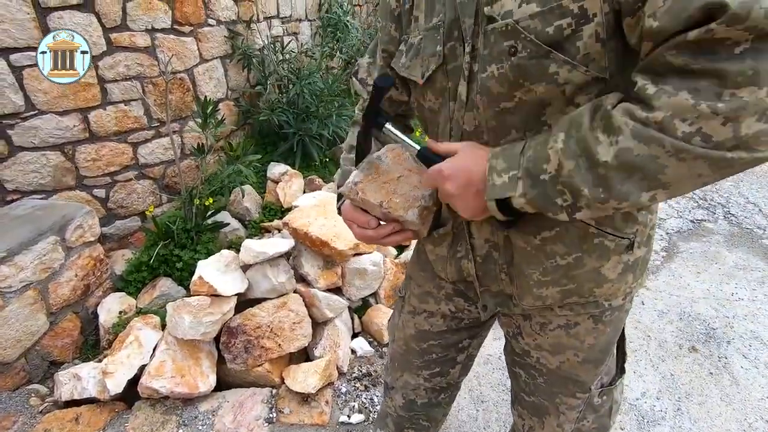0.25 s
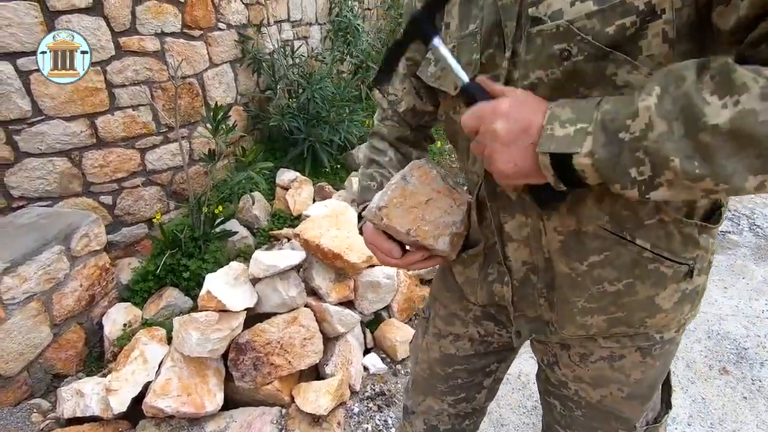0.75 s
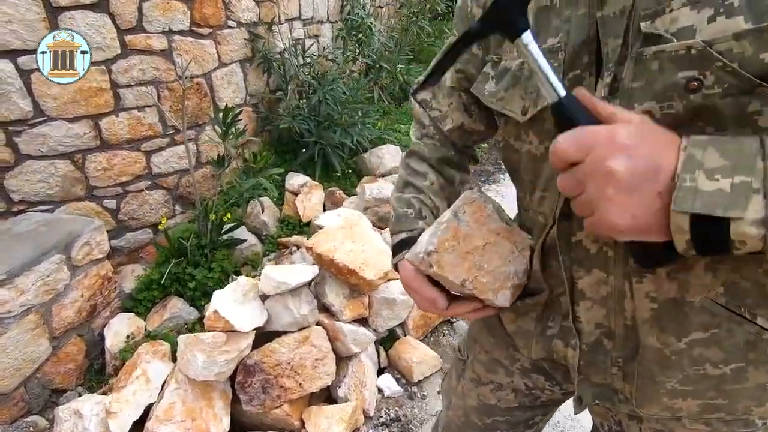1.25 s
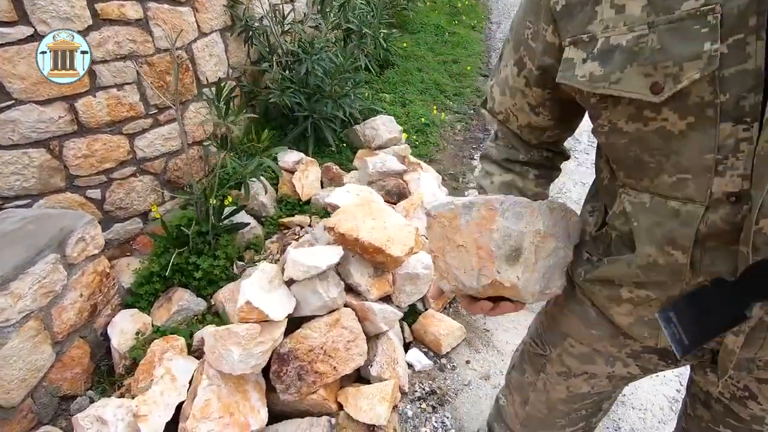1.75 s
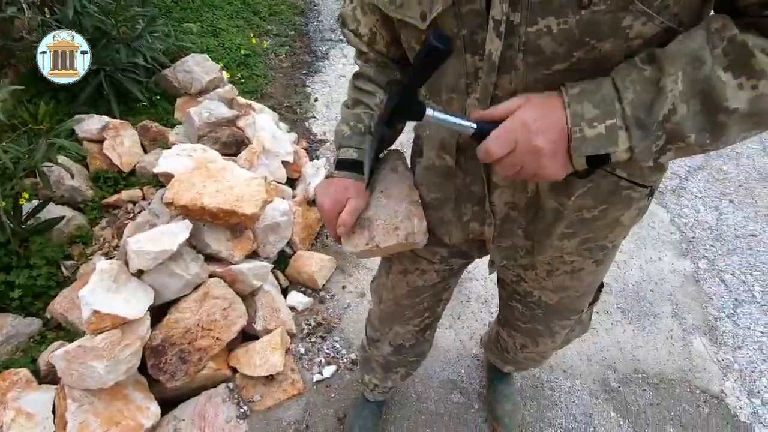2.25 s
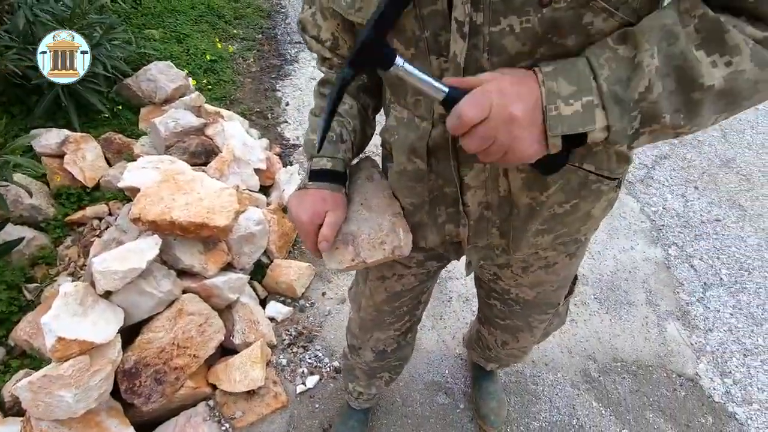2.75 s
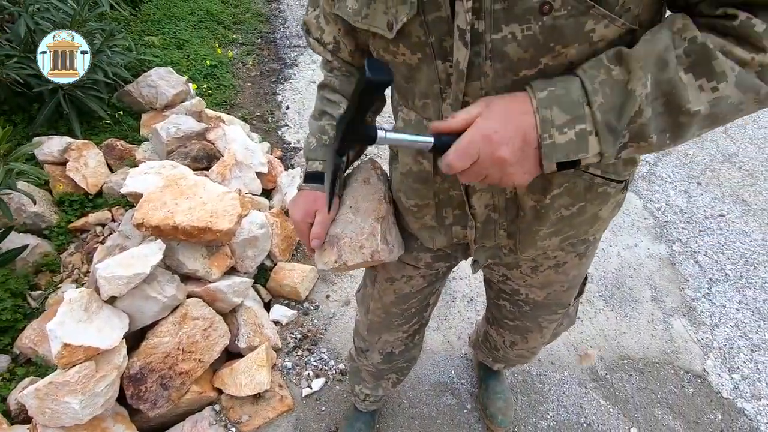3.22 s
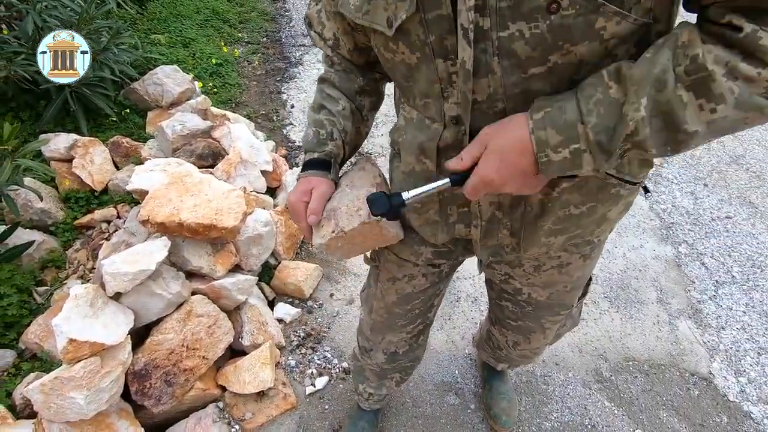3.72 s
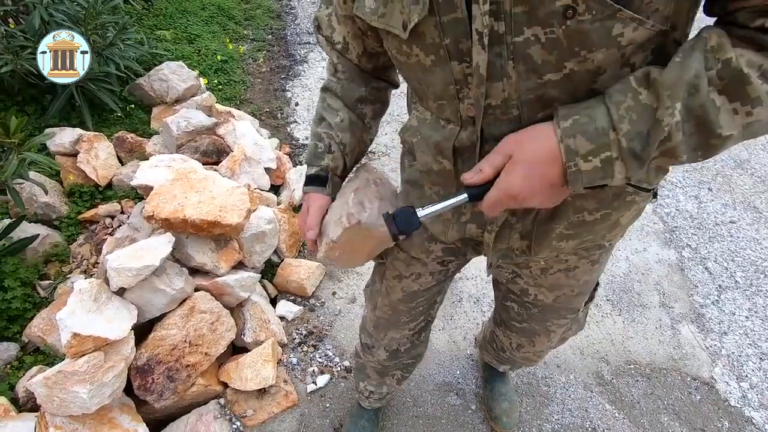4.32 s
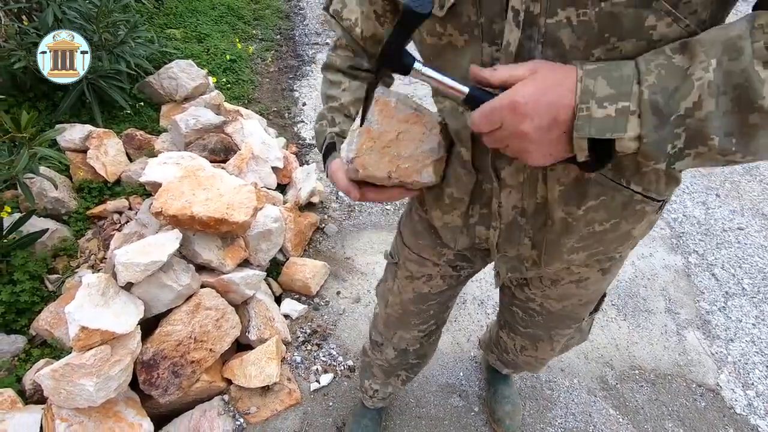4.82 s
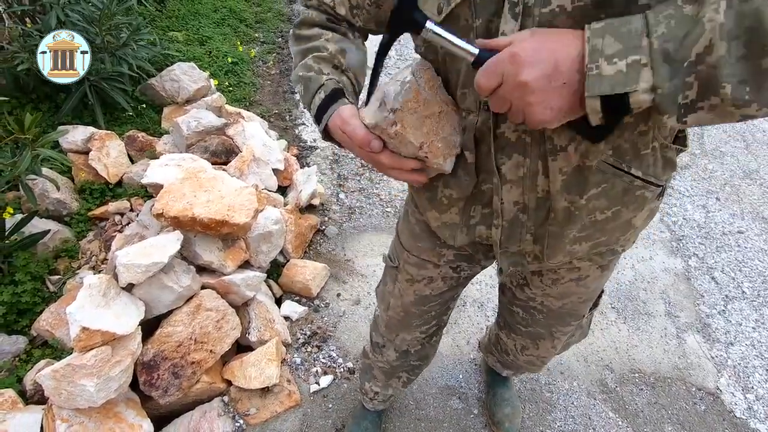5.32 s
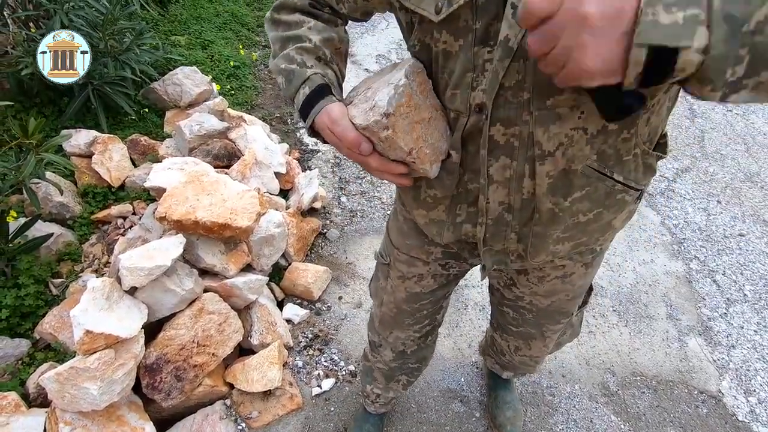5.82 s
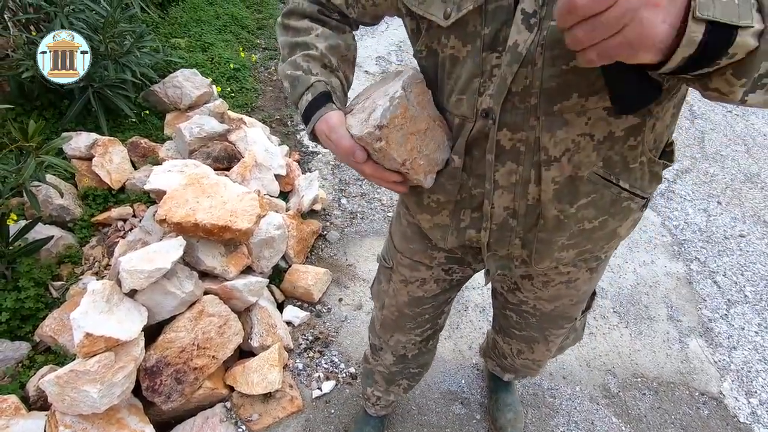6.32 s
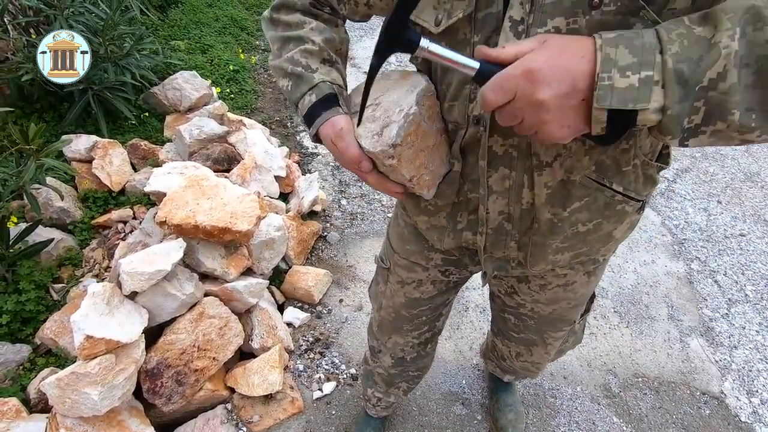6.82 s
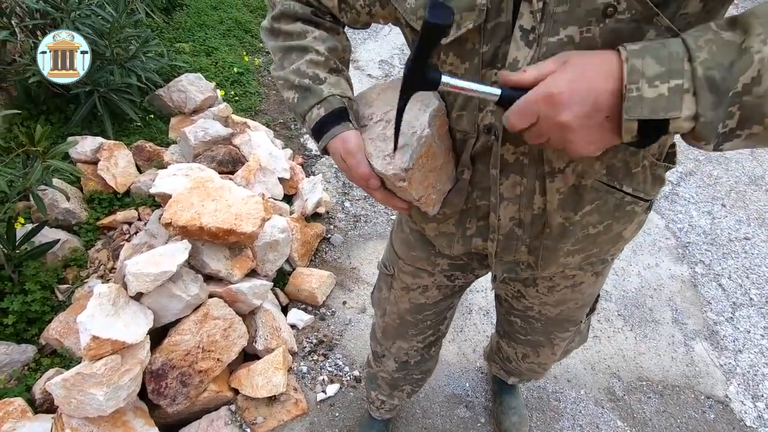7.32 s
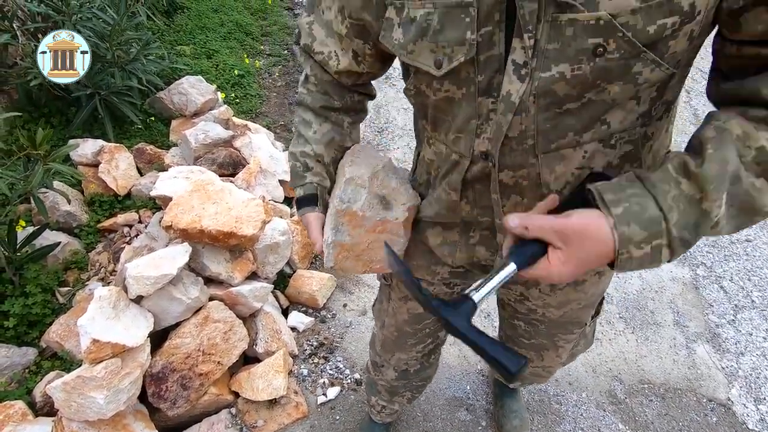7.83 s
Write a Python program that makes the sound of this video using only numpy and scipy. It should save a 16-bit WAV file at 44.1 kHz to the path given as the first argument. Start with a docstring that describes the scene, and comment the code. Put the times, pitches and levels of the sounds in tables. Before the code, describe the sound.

Sharp, short knocks of steel on rough stone, uneven in pitch and force, run steadily with two brief breaks. In the breaks the stone is turned, rubbing the palm and scraping while coarse sleeves rustle. Tiny chips tick and grit patters after blows. The work is close and central, almost dry, with only a faint wall reflection, light wind rumble and a far low drone.

```python
"""Sharp knocks come in runs at about four a second: a mason dresses a hand-held stone with a steel hammer outdoors.
Soft noise swells up to each knock; stone modes clack, with copies a few ms before and after, mostly weaker.
The hand thuds, steel and handle ring faintly; bursts of grains make the grit after every blow, chips and scrapes.
Banded noise makes the sleeves rustle, flicking after each blow, and the palm rub as the stone is turned.
Shaped noise makes the gusts that buffet the microphone, the open air and a low far drone; a wall adds a faint tail."""
import sys
import numpy as np
from scipy import signal
from scipy.fft import rfft, irfft, next_fast_len
from scipy.io import wavfile
from scipy.ndimage import uniform_filter1d

SR = 44100
rng = np.random.default_rng(int(sys.argv[2]) if len(sys.argv) > 2 else 0)


def waveform_to_disk(signal):
    """Save audio, clipped to [-1, 1], as 16-bit WAV at the path in sys.argv[1]."""
    frames = np.transpose(np.atleast_2d(signal))
    scaled = np.clip(frames, -1, 1) * 32767
    samples = np.round(scaled).astype(np.int16)
    wavfile.write(sys.argv[1], SR, samples)


N = 355798
TIME = np.arange(N) / SR
AGE = np.arange(SR // 2) / SR  # time since a contact, s
SHORT = AGE[:SR // 10]
GRIT_FILTER = signal.butter(6, 9300, fs=SR, output="sos")  # low-pass


def undb(db):
    """Decibels to gain."""
    return 10 ** (np.asarray(db) / 20)


def unit(x):
    """Scale to rms 1."""
    return x / np.sqrt(np.mean(x ** 2))


def hit_level(x, db):
    """Scale a short sound so that its energy, spread over 10 ms, has this rms level."""
    return x * undb(db) / np.sqrt(np.sum(x ** 2) / (SR / 100))


def add(track, s, x):
    """Mix x into the track at time s."""
    i = int(s * SR)
    track[i:i + len(x)] += x[:len(track) - i]


def band(x, lo_hz, hi_hz):
    """Causal band-pass."""
    sos = signal.butter(2, [lo_hz, min(hi_hz, SR / 2 - 10)], "band", fs=SR, output="sos")
    return signal.sosfilt(sos, x)


def colour(x, points):
    """Shape the spectrum of a steady signal, rolling off beyond the last point, at rms 1."""
    hz, db = np.transpose(points)
    size = next_fast_len(N)
    f = np.maximum(np.fft.rfftfreq(size, 1 / SR), 1)
    gain = undb(np.interp(np.log(f), np.log(hz), db))
    gain = gain / (1 + (f / hz[-1]) ** 10)
    return unit(irfft(rfft(x, size) * gain, size)[:N])


def walk(rate):
    """Smooth random drift at rms 1, with about this many new values a second."""
    hold = int(SR / rate)
    steps = rng.standard_normal(N)[np.arange(N) // hold]
    return unit(uniform_filter1d(steps, hold))


def swell(middle_s, length_s, db):
    """Power of a movement or gust that rises and dies away smoothly."""
    return undb(db) ** 2 * np.exp(-2 * (2 * (TIME - middle_s) / length_s) ** 2)


def fade(t, t60):
    """Exponential decay by 60 dB in t60 seconds."""
    return np.exp(-np.log(1000) * t / t60)


def mode(t, hz, t60):
    """One struck resonance: a decaying sine."""
    return np.sin(2 * np.pi * hz * t) * fade(t, t60)


def crush(lo_hz, hi_hz, t60):
    """Grains of uneven size break in a quickly fading spray with little above 10 kHz."""
    sizes = undb(6.5 * rng.standard_normal(len(SHORT)))
    grains = rng.standard_normal(len(SHORT)) * sizes
    return signal.sosfilt(GRIT_FILTER, band(grains * fade(SHORT, t60), lo_hz, hi_hz))


EARLY_COPY_LEAD_S, LATE_COPY_LAG_S = 0.0066, 0.0068
# the two lowest resonances; as the body's falls, the knock's rises in proportion
KNOCK_HZ, BODY_HZ = 847, 1775
# hammer blows; the spot that is struck decides which resonances of the stone lead
# levels are rms over 10 ms; the copies are relative to the main clack:
# (start_s, thud_db, knock_db, body_db, clack_db, snap_db, steel_ring_db,
#  body_hz, clack_hz, snap_hz, early_copy_re_main_db, late_copy_re_main_db)
HAMMER_BLOWS = [(0.1235, -28, -21, -23, -23, -25, -50, 1410, 2830, 6080, -11, -27),
                (0.381, -26, -35, -26.5, -28, -28.5, -68, 1607, 2090, 4530, 1, -32),
                (0.641, -28, -32, -21.5, -18.5, -23.5, -47, 1565, 3170, 4430, -13, -21.5),
                (0.8917, -28, -30.5, -22.5, -18.5, -24, -62.5, 2080, 3015, 4640, -17, -27),
                (1.1479, -28.5, -36.5, -25, -25, -20.5, -58.5, 2000, 2820, 5680, -21, -7),
                (1.4112, -29.5, -27.5, -29, -22, -31, -47.5, 1730, 3110, 4500, -15, -24),
                (2.1608, -25, -18, -45, -26.5, -31.5, -48, 1570, 2954, 6350, -11, -27),
                (2.4079, -23, -22.5, -26, -22.5, -30, -48, 1470, 3110, 4840, -13.5, -13),
                (2.6549, -24, -22, -24, -23.5, -32.5, -46.5, 1840, 3150, 7100, -14, -11.5),
                (2.9161, -25, -18.5, -35, -21, -27.5, -53, 1780, 2775, 5900, -15.5, -35),
                (3.2044, -29, -31.5, -40, -21.5, -31.5, -60, 2170, 2500, 4520, 0, -32),
                (3.5222, -28.5, -37.5, -26.5, -18.5, -33, -58, 2030, 2450, 4600, -23, -23.5),
                (3.7963, -38, -27, -34.5, -30.5, -31.5, -51, 2060, 2690, 6830, -1, -25),
                (4.0462, -37.5, -25, -37, -18.5, -23.5, -57, 1800, 2220, 4880, -30, -15.5),
                (4.322, -23.5, -30.5, -32.5, -26, -25, -49, 1400, 3030, 4830, -2, -29),
                (5.1793, -23, -25, -26, -29, -21, -50, 1520, 2830, 6765, -33, -13),
                (5.436, -26.5, -36, -26, -19.5, -24.5, -57, 1455, 2650, 4600, -11.5, -35),
                (5.7, -26, -35, -24.5, -18, -27.5, -49, 2130, 2600, 3750, -11, -19),
                (5.9668, -26, -35, -35, -18.5, -32, -63, 2040, 2790, 4700, -6.5, -33.5),
                (6.2205, -28, -19.5, -28, -23, -20.5, -53, 1330, 3380, 5650, -25, -27),
                (6.5962, -26.5, -31, -30, -20.5, -31, -43.5, 1730, 2630, 4200, -47, -9),
                (6.8573, -21.5, -29.5, -32, -15.5, -27.5, -45, 2040, 2740, 4740, -40, -10.5),
                (7.1292, -21.5, -24.5, -23, -18, -29.5, -50, 2070, 2900, 4500, -17, -18),
                (7.3767, -27.5, -22.5, -43, -16, -25.5, -66, 1760, 2817, 3960, -16.5, -38),
                (7.6332, -27.5, -29, -50, -20, -28, -52, 2160, 2330, 4580, -28, -12.5)]


def hammering():
    """Every blow clacks the stone, shoves it into the hand, rings the hammer and throws grit."""
    out = np.zeros(N)
    for (s, thud_db, knock_db, body_db, clack_db, snap_db, steel_db,
         body_hz, clack_hz, snap_hz, early_copy_db, late_copy_db) in HAMMER_BLOWS:
        lead_in = lead_in_noise()
        add(out, s - len(lead_in) / SR, hit_level(lead_in, -40))
        levels_db = [knock_db, body_db, clack_db, snap_db]
        leads_hz = [KNOCK_HZ * BODY_HZ / body_hz, body_hz, clack_hz, snap_hz]
        clack = contact(levels_db, leads_hz)
        # each clack has copies, mostly weaker, just before and after
        for lag, db in (-EARLY_COPY_LEAD_S, early_copy_db), (0, 0), (LATE_COPY_LAG_S, late_copy_db):
            add(out, s + lag, undb(db) * clack)
        add(out, s, hit_level(hand_thud(), thud_db))
        add(out, s, handle_ring(s, thud_db, knock_db, clack_db))
        add(out, s, hit_level(steel_ring(), steel_db))
        add(out, s, hit_level(mode(SHORT, 8350, 0.033), snap_db - 19.5))  # the tip's first bright ping
        throw_grit(out, s)
    return out


# the stone's knock, body, clack and snap ranges, damped by the hand; the rest is relative to the leading mode:
# (lowest_hz, highest_hz, lead_t60_s, rest_t60_s, rest_re_lead_db)
STONE_RANGES = [(404, 1362, 0.0036, 0.016, -1), (1390, 2156, 0.015, 0.014, -5.5),
                (1989, 4046, 0.0091, 0.017, -2), (4120, 7605, 0.007, 0.0066, -1)]


def contact(levels_db, leads_hz):
    """Steel meets stone: in each range one resonance leads many short ones; the edge cracks."""
    snap_db = levels_db[-1]
    out = hit_level(crush(5600, 9760, 0.017), snap_db - 10.5)
    crack = band(rng.standard_normal(len(SHORT)) * fade(SHORT, 0.011), 10000, 14000)
    out += hit_level(crack, snap_db - 22)
    for stone_range, db, hz in zip(STONE_RANGES, levels_db, leads_hz):
        lo_hz, hi_hz, lead_t60, rest_t60, rest_db = stone_range
        lead = hit_level(band(mode(SHORT, hz, lead_t60), 0.63 * hz, 1.62 * hz), 0)
        rest = hit_level(stone_modes(lo_hz, hi_hz, rest_t60, count=8), rest_db)
        out += hit_level(lead + rest, db)
    return out


def stone_modes(lo_hz, hi_hz, t60, count):
    """Modes spread over a range and damped by the hand; each blow weights them anew."""
    place, weight = rng.random(count), rng.standard_normal(count)
    hz = lo_hz * (hi_hz / lo_hz) ** ((np.arange(count) + place) / count)
    return band(weight @ mode(SHORT, hz[:, None], t60), lo_hz, hi_hz)


def hand_thud():
    """The blow shoves the stone into the hand: two low, short resonances."""
    thud = mode(SHORT, 167.5, 0.029) + undb(-1.5) * mode(SHORT, 306, 0.039)
    return band(thud, 91, 380)


HANDLE_HZ, HANDLE_RE_THUD_DB = 340, -10.5
HANDLE_DB_PER_DB = -0.12  # dB for each dB of knock above clack
LOOSE_FROM_S, LOOSE_UNTIL_S, LOOSE_DB = 4.8, 7.25, 6


def handle_ring(s, thud_db, knock_db, clack_db):
    """The handle's hollow ring: stronger for a glancing blow (knock below clack), and while the grip is loose."""
    db = thud_db + HANDLE_RE_THUD_DB
    db += HANDLE_DB_PER_DB * (knock_db - clack_db)
    db += LOOSE_DB * (LOOSE_FROM_S < s < LOOSE_UNTIL_S)
    return hit_level(mode(SHORT, HANDLE_HZ, 0.1), db)


# the hammer head's mode pitches: (pitch_hz)
STEEL_PITCHES = [7180, 8172, 8197, 14045]
# the same modes in the same order, levels relative to the first: (level_db, t60_s)
STEEL_MODES = [(0, .14), (-4, .27), (-2, .13), (-20, .1)]


def steel_ring():
    """The hammer head rings in a few high modes; the close pair beats."""
    return sum(undb(db) * mode(AGE, hz, t60) for hz, (db, t60) in zip(STEEL_PITCHES, STEEL_MODES))


GRIT_DB, GRIT_DELAY_S, GRIT_SPREAD_S = -44, 0.018, 0.024  # the level is that of the loudest grit


def throw_grit(track, s):
    """Four small sprays of grit fall just after a blow; later ones tend to be quieter."""
    for when, size in rng.random((4, 2)):
        spray = hit_level(crush(870, 3800, 0.046), GRIT_DB - 9 * when - 6 * size)
        add(track, s + GRIT_DELAY_S + GRIT_SPREAD_S * when, spray)


def lead_in_noise():
    """A soft noise, a low band with a faint hiss, swells for 30 ms up to each knock."""
    rise = fade(SHORT[:int(0.03 * SR)], 0.05)[::-1]
    hiss = band(band(rng.standard_normal(len(rise)), 1100, 5300), 1100, 5300)
    low = band(rng.standard_normal(len(rise)), 560, 930)
    return (low + undb(-14) * hiss) * rise


# light touches of the hammer and falling chips, rms over 10 ms: (start_s, level_db, centre_hz)
LIGHT_TICKS = [(0.242, -54, 4830), (1.4433, -39, 1260), (1.5147, -46.5, 1620), (1.8374, -38.5, 1930),
               (1.963, -39, 1620), (2.1294, -48, 1610), (2.1943, -41.5, 1030), (2.768, -53, 2170),
               (3.459, -41, 3940), (3.465, -41, 4000), (3.579, -49, 3140), (3.6017, -45.5, 8050),
               (3.68, -47, 4430), (4.418, -46, 1630), (4.4557, -54, 3170), (5.4741, -44.5, 2730),
               (5.9889, -43, 2300), (6.56, -42.5, 3900), (6.6242, -40, 2310), (6.7949, -48.5, 4400),
               (6.8853, -38, 2800), (7.1515, -36.5, 2240), (7.94, -46.5, 5560)]


def chips():
    """Small hard contacts, each with a short scatter of grit."""
    out = np.zeros(N)
    for s, db, hz in LIGHT_TICKS:
        add(out, s, hit_level(crush(0.84 * hz, 1.4 * hz, 0.0033), db))
        add(out, s, hit_level(crush(0.19 * hz, 1.67 * hz, 0.063), db + 2))
    return out


# the stone drags over palm and sleeve, or grit slides off it; the contacts start from this level and pitch
# and are then trimmed, dropped at random and spread into a wide band: (start_s, length_s, level_db, centre_hz)
STONE_SCRAPES = [(1.516, 0.065, -49, 5000), (1.69, 0.033, -45, 1780), (1.819, 0.041, -36, 1500),
                 (1.958, 0.032, -30.5, 1280), (4.063, 0.068, -51.5, 2300), (4.332, 0.044, -47, 2640),
                 (4.416, 0.029, -49, 1180), (4.805, .04, -49.5, 2750), (7.784, 0.037, -46.5, 2810),
                 (8.01, .035, -46, 2600)]


def scrapes():
    """A rough face catches and slips in a run of tiny contacts."""
    out = np.zeros(N)
    for s, length, db, hz in STONE_SCRAPES:
        for when, size in rng.random((10, 2)):
            catch = crush(0.055 * hz, 1.23 * hz, 0.021)
            add(out, s + length * when, hit_level(catch, db - 1.5 - 12 * size))
    return out


RUB_RE_RUSTLE_DB = -5.5  # palm on stone, at a rustle of -60 dB
RUB_GROWTH = 1.2  # dB of rub for each dB of rustle
SLIP_FAST_DB, SLIP_SLOW_DB = 2.6, 1.2
# spectral shape of palm on stone: (pitch_hz, relative_level_db)
RUB_SPECTRUM = [(100, -13), (250, 7.5), (500, 5.5), (1300, 0), (2200, -21), (5000, -44)]
# spectral shape of the coarse sleeves: (pitch_hz, relative_level_db)
RUSTLE_SPECTRUM = [(600, -11), (1400, 4), (2800, 5.5), (4300, -3), (7000, -7), (9600, -13.5), (11500, -25),
                   (16000, -57.5)]


def clothes():
    """Palm and stone rub, coarse sleeves rustle in uneven little slips; one row for each channel."""
    rustle_db = effort_db()
    rub_db = -60 + RUB_RE_RUSTLE_DB + RUB_GROWTH * (rustle_db + 60)
    slips = undb(SLIP_FAST_DB * walk(70) + SLIP_SLOW_DB * walk(19))
    out = 0
    for spectrum, db in (RUB_SPECTRUM, rub_db), (RUSTLE_SPECTRUM, rustle_db):
        mid, side = (colour(row, spectrum) for row in fibres())
        out = out + slips * undb(db) * (mid + undb(-6) * np.array([side, -side]))
    return out


CLOTH_REST_DB = -65  # the jacket never quite keeps still
# the arm after each blow: the sleeve rustles as it lifts, then flicks at the top of the backswing
LIFT_S, LIFT_DB = 0.31, -64
BACKSWING_S, FLICK_S, FLICK_DB = 0.137, 0.019, -57.5
# the worker turns the stone or shifts his grip; the level is the rustle's share at the middle:
# (middle_s, length_s, level_db)
STONE_TURNS = [(1.0, 0.38, -62), (1.525, 0.14, -51), (1.803, 0.74, -53), (1.998, 0.097, -48.5),
               (2.413, 0.44, -57.5), (3.046, 0.72, -62), (3.585, 0.079, -64), (4.573, 1, -59.5),
               (4.826, 0.22, -55.5), (7.833, 0.19, -53.5), (8.042, 0.16, -48)]


def effort_db():
    """How much the worker moves: a lift and a flick of the sleeve for each blow, and the turns of the stone."""
    power = undb(CLOTH_REST_DB) ** 2 + sum(swell(*turn) for turn in STONE_TURNS)
    for s, *_ in HAMMER_BLOWS:
        power = power + swell(s + BACKSWING_S / 2, LIFT_S, LIFT_DB)
        power = power + swell(s + BACKSWING_S, FLICK_S, FLICK_DB)
    return 10 * np.log10(power)


FOLD_DB = 1.8  # spread of each band's level


def fibres():
    """Threads catch at random; each fold favours other bands for a moment. Rows are mid and side."""
    grains = rng.standard_normal((2, N)) * undb(2.9 * rng.standard_normal(N))
    edges_hz = 350 * 2 ** np.arange(0, 6, 0.75)
    out = band(grains, 91, edges_hz[0])
    for lo_hz, hi_hz in zip(edges_hz, edges_hz[1:]):
        grains = np.roll(grains, SR // 10, axis=1)  # shifted so that no two bands catch together
        out = out + band(grains, lo_hz, hi_hz) * undb(FOLD_DB * walk(25))
    return out


BREEZE_DB, BREEZE_SWAY_DB = -62, 7
# spectral shape of the buffeting: (pitch_hz, relative_level_db)
WIND_SPECTRUM = [(15, -7.5), (35, 2), (80, -1), (150, -12.5), (300, -33.5), (700, -59.5)]
# gusts on the microphone; the level is the mid signal's at the middle: (middle_s, length_s, level_db)
WIND_GUSTS = [(0.017, 0.13, -43.5), (0.885, .14, -30.5), (1.21, 0.67, -45), (1.531, 0.21, -29),
              (1.892, 0.31, -31), (2.346, 0.35, -52), (3.146, 0.21, -42.5), (3.848, 0.071, -33.5),
              (4.056, 0.41, -45.5), (4.677, 0.65, -53)]


def wind():
    """Gusts rise out of a light breeze; their eddies buffet the two microphone ports, partly alike."""
    mid, side = (colour(rng.standard_normal(N), WIND_SPECTRUM) for _ in range(2))
    breeze = undb(BREEZE_DB + BREEZE_SWAY_DB * walk(6.5)) ** 2
    power = breeze + sum(swell(*gust) for gust in WIND_GUSTS)
    return np.sqrt(power) * (mid + undb(-4.5) * np.array([side, -side]))


# level of the distant drone, joined by straight lines: (time_s, level_db)
DRONE_LEVELS = [(0, -62.5), (2.5, -60), (4.4, -68), (4.9, -51.5), (6.3, -54.5), (7.3, -50), (7.6, -56),
                (8.07, -67)]


def distant_drone():
    """A narrow band of low noise wavers far away."""
    hum = unit(band(rng.standard_normal(N), 73.4, 84))
    return undb(np.interp(TIME, *np.transpose(DRONE_LEVELS))) * hum


# spectral shape of the open air: (pitch_hz, relative_level_db)
AIR_SPECTRUM = [(20, -12.5), (50, -5), (76, -1), (120, -8), (200, 4), (280, -23), (550, -21), (1100, -11.5),
                (2800, -21), (5000, -50), (9000, -54.5), (12000, -44)]


def outdoors():
    """Quiet open air, slowly swaying in level, with the drone in the middle."""
    mid, side = (colour(rng.standard_normal(N), AIR_SPECTRUM) for _ in range(2))
    level = undb(-61.5 + walk(1.0))
    return distant_drone() + level * (mid + undb(-9.5) * np.array([side, -side]))


def surroundings(x):
    """Body and ground scatter the sound at once; the wall and the yard add a faint tail."""
    out = []
    for _ in range(2):
        near = band(rng.standard_normal(len(AGE)), 170, 10000) * fade(AGE, 0.06) * (AGE > 0.002)
        far = band(rng.standard_normal(len(AGE)), 800, 3500) * fade(AGE, 0.45) * (AGE > 0.015)
        echo = undb(-20.5) * near / np.linalg.norm(near) + undb(-37) * far / np.linalg.norm(far)
        out.append(signal.fftconvolve(x, echo)[:N])
    return np.array(out)


def port_difference(x, lo_hz, hi_hz):
    """The part of a band that reaches the two microphone ports out of step: a quarter cycle behind."""
    late = signal.hilbert(x, next_fast_len(N))[:N].imag
    # filtered forwards and backwards, so the band-pass adds no delay
    return band(band(late, lo_hz, hi_hz)[::-1], lo_hz, hi_hz)[::-1]


def scene():
    """The work is straight ahead; only the highest treble differs much between the ports."""
    work = hammering() + chips() + scrapes()
    side = undb(0.5) * port_difference(work, 7200, 13000)
    side += undb(-13) * port_difference(work, 700, 6000)
    ports = work + np.array([side, -side])
    return ports + surroundings(work) + clothes() + wind() + outdoors()


TOP_HZ = 16200


def record(dry):
    """Round the loudest peaks softly, then cut the treble steeply above TOP_HZ."""
    rounded = np.tanh(dry)
    return signal.sosfilt(signal.ellip(8, 0.2, 70, TOP_HZ, fs=SR, output="sos"), rounded)


dry = scene()
out = record(dry)
waveform_to_disk(out)
```